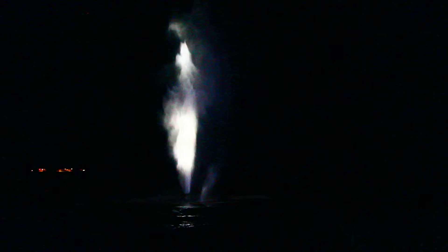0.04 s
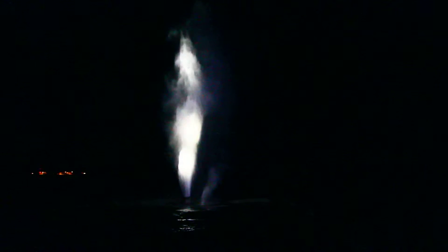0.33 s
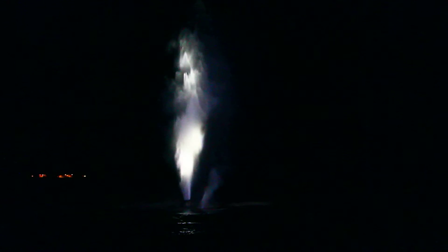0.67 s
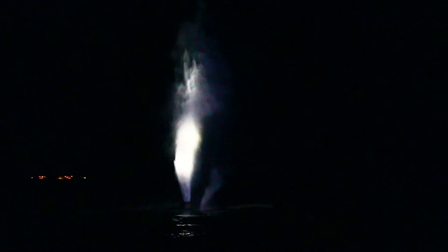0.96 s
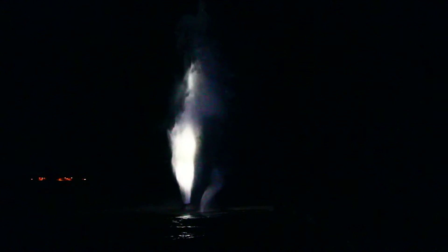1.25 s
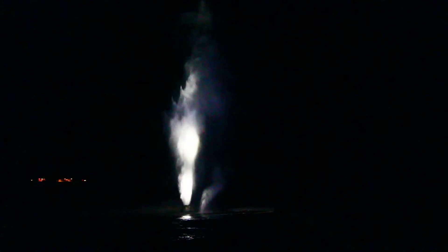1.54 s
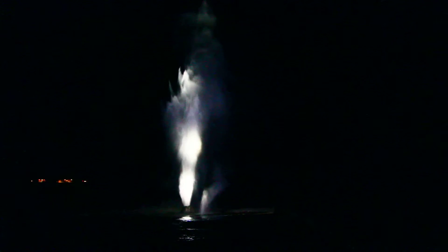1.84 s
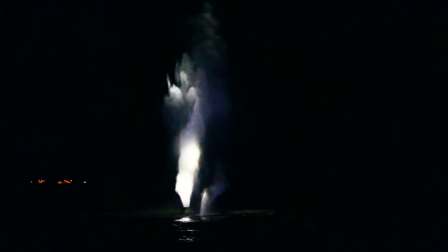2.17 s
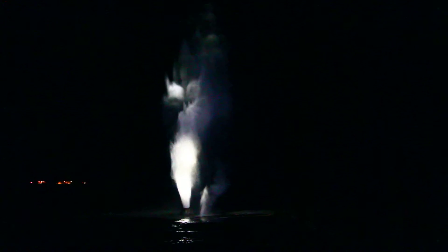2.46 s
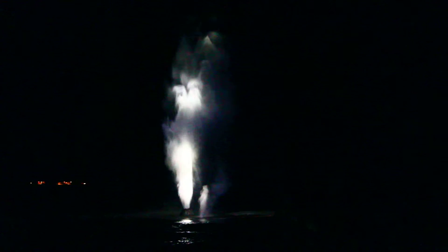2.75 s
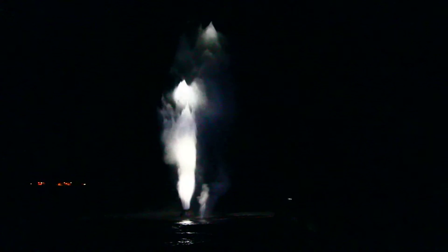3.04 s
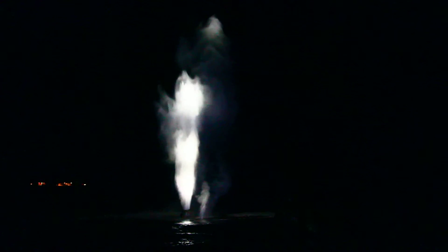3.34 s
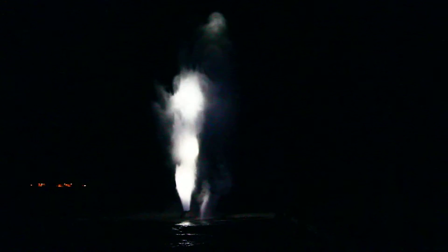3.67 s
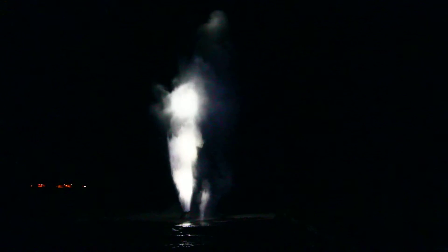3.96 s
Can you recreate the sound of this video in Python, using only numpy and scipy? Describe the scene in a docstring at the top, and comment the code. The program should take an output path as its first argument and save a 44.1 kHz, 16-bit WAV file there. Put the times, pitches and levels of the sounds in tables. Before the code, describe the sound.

A geyser is already erupting at the start, some way off, with a broad roar of steam, an uneven low water rumble and a fine spray hiss. The sound swells and brightens slightly near 0.5 and 1.5 seconds, sags around 2.4 seconds, then pushes again at 3.4 seconds. It dips briefly near 3.8 seconds and is still rushing at 4 seconds.

```python
"""A geyser erupts steadily, some way off across flat wet ground at night.
From the start, steam tears out of the vent in a broad roar that swells and brightens with the jet's
thrust; the surging water column rumbles beneath, fine spray hisses on top. Jet and column push near
0.5 s and 1.5 s, sag around 2.4 s, push again at 3.4 s and dip briefly before the end."""
import sys
import numpy as np
from scipy import signal
from scipy.fft import rfft, irfft
from scipy.io import wavfile
from scipy.ndimage import uniform_filter1d

SR = 44100
rng = np.random.default_rng(int(sys.argv[2]) if len(sys.argv) > 2 else 0)


def store_wav(level_fs):
    """Save 16-bit WAV to argv[1]."""
    pcm = np.round(np.clip(np.atleast_2d(level_fs), -1, 1) * 32767)
    wavfile.write(sys.argv[1], SR, pcm.T.astype(np.int16))


N = 176400

# jet thrust, as the level of its rush (time [s], level [dB])
JET_THRUST = [(0.08, -30.5), (0.15, -30.5), (0.33, -33), (0.43, -33), (0.52, -30.5), (0.69, -32),
              (0.88, -35), (1.22, -34), (1.32, -32), (1.43, -31.5), (1.58, -30), (1.83, -31.5), (2.2, -32),
              (2.31, -35), (2.55, -34.5), (2.83, -32), (3.13, -32.5), (3.38, -30.5), (3.55, -31.5),
              (3.68, -34.5), (3.83, -36), (3.94, -32.5), (4.0, -33)]
# water column surges, as the level of the rumble (time [s], level [dB])
COLUMN_SURGE = [(0.08, -23.5), (0.15, -24.5), (0.31, -29), (0.43, -31.5), (0.48, -23.6), (0.58, -28),
                (0.67, -25), (0.8, -34), (1.0, -33), (1.22, -32), (1.29, -25.5), (1.41, -31), (1.5, -23.5),
                (1.64, -25), (1.95, -28), (2.15, -26.9), (2.36, -35), (2.6, -30), (2.82, -28), (2.9, -30),
                (3.03, -26), (3.12, -29), (3.36, -23.9), (3.55, -30.1), (3.66, -38.4), (3.79, -35.5),
                (3.84, -28), (3.89, -31), (4.0, -30.5)]
# steam roar spectrum (frequency [Hz], density [dB])
ROAR_SPECTRUM = [(60, -5), (250, -3), (410, -3), (490, 1), (640, -3), (780, 0), (950, -0.5), (1130, -5),
                 (1330, -1), (1600, -3), (1900, -5.5), (2150, -5), (2750, -6.5), (3200, -9.5), (3600, -9.5),
                 (4400, -14), (7000, -17.5), (15500, -52)]
# column rumble spectrum (frequency [Hz], density [dB])
RUMBLE_SPECTRUM = [(10, -22), (22, -14), (36, -7.5), (54, -0.5), (100, 0), (135, -2.5), (200, -6.5),
                   (285, -10), (380, -19), (600, -48), (1500, -69)]
# spray hiss spectrum (frequency [Hz], density [dB])
SPRAY_SPECTRUM = [(1500, -8.5), (3500, -16), (4700, -4), (5800, 1), (7000, -2.5), (8000, -5), (9400, -9),
                  (10700, -9), (11800, -11.5), (13500, -11.5), (15600, -16.5)]


def steam_roar(thrust_db, surge_db):
    """Eddies of each size flicker on their own; all follow the thrust, large ones also the surge."""
    level_db, flicker_db, flicker_hz = -31.5, 0.5, 22
    follow, follow_per_octave = 0.97, 0.05  # dB per dB of thrust
    surge_share = 0.13
    spectrum = rfft(turbulence(ROAR_SPECTRUM))
    bin_octave = np.clip(bin_octaves(), -4, 4)
    roar = 0
    for octave in range(-4, 5):
        band = irfft(spectrum * np.maximum(1 - abs(bin_octave - octave), 0), N)
        drive_db = (follow + follow_per_octave * octave) * thrust_db
        if octave < 0:  # below 1 kHz
            drive_db = (1 - surge_share) * drive_db + surge_share * (surge_db - surge_db.mean())
        roar = roar + band * gain(drive_db + flicker_db * waver(flicker_hz))
    return gain(level_db) * roar


def water_column(surge_db):
    """Slugs of water and steam chug unevenly through the vent."""
    chug_db, chug_hz = 0.95, 35
    return turbulence(RUMBLE_SPECTRUM) * gain(surge_db + chug_db * waver(chug_hz))


def spray(thrust_db):
    """Countless drops merge with the hiss of the mist; both rise with the thrust."""
    drops_per_s, drop_power_share = 6900, 0.23
    level_db, follow = -44, 1.2
    impacts = (rng.random(N) < drops_per_s / SR) * rng.standard_normal(N)
    drops = np.sqrt(drop_power_share) * colour(impacts, SPRAY_SPECTRUM)
    mist = np.sqrt(1 - drop_power_share) * turbulence(SPRAY_SPECTRUM)
    return (drops + mist) * gain(level_db + follow * thrust_db)


def turbulence(spectrum, window_samples=4000):
    """Coloured noise, slow level held even so that the flow sets its swells."""
    noise = colour(rng.standard_normal(N), spectrum)
    return noise / np.sqrt(uniform_filter1d(noise ** 2, window_samples))


def waver(rate_hz):
    """Random steps at rate_hz, smoothed twice; rms 1."""
    hold_samples = int(SR / rate_hz)
    steps = rng.standard_normal(N)[np.arange(N) // hold_samples]
    ramps = uniform_filter1d(steps, hold_samples)
    return unit_rms(uniform_filter1d(ramps, hold_samples))


def colour(x, spectrum):
    """Filter x by a spectrum table; rms 1."""
    hz, db = np.array(spectrum).T
    bin_db = np.interp(bin_octaves(), np.log2(hz / 1000), db)
    return unit_rms(irfft(rfft(x) * gain(bin_db), N))


def bin_octaves():
    """FFT bin frequencies in octaves re 1 kHz."""
    bin_hz = np.arange(N // 2 + 1) * SR / N
    return np.log2(np.maximum(bin_hz, 1) / 1000)


def curve(rows):
    """Linear interpolation of (time [s], value) rows."""
    return np.interp(np.arange(N) / SR, *np.array(rows).T)


def gain(db):
    return 10 ** (db / 20)


def unit_rms(x):
    return x / np.sqrt(np.mean(x ** 2))


def scene():
    """One wavering thrust drives roar and spray above the rumble; both channels equal."""
    eddy_db, eddy_hz = 0.34, 25
    thrust_db, surge_db = curve(JET_THRUST), curve(COLUMN_SURGE)
    thrust_db = thrust_db - thrust_db.mean() + eddy_db * waver(eddy_hz)
    geyser = steam_roar(thrust_db, surge_db) + water_column(surge_db) + spray(thrust_db)
    return np.array([geyser, geyser])


def record(dry):
    """The sound cuts in mid-eruption; a steep low-pass removes the top treble."""
    start_s, fade_s, cutoff_hz = 0.072, 0.001, 15700
    fade_in = np.clip((np.arange(N) / SR - start_s) / fade_s, 0, 1)
    lowpass = signal.ellip(10, 0.1, 90, cutoff_hz, fs=SR, output="sos")
    return signal.sosfilt(lowpass, dry * fade_in)


dry = scene()
out = record(dry)
store_wav(out)
```